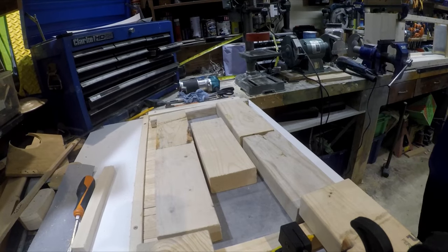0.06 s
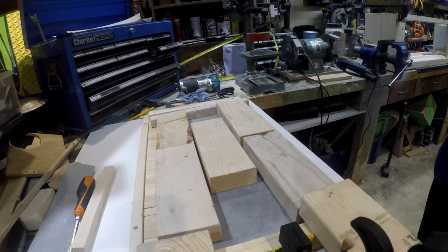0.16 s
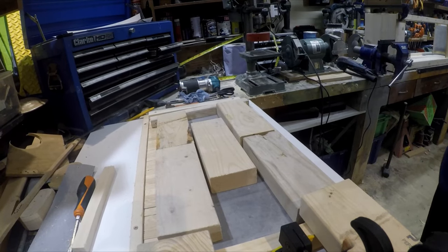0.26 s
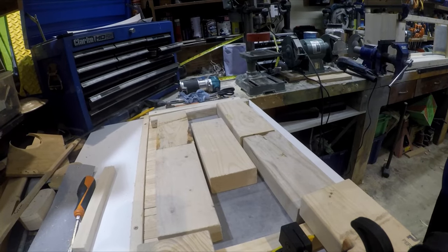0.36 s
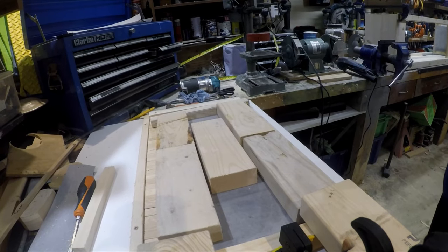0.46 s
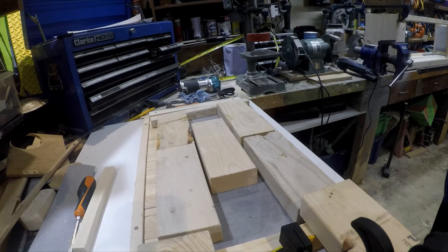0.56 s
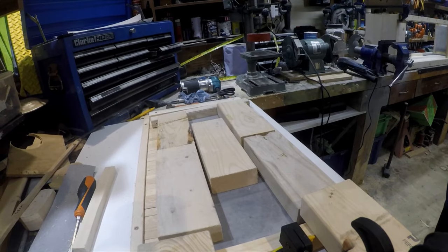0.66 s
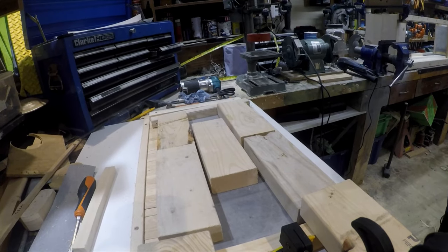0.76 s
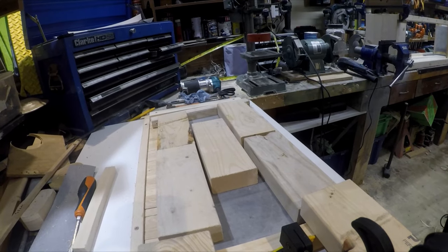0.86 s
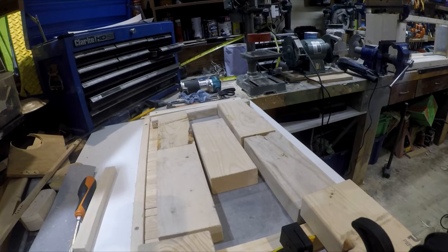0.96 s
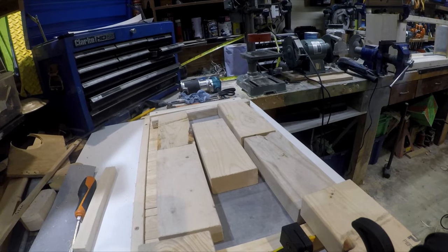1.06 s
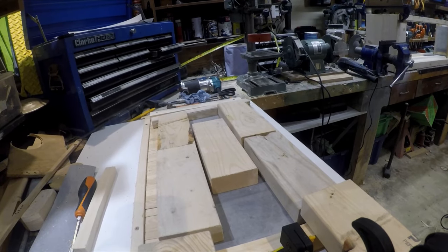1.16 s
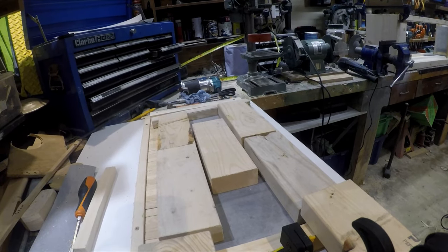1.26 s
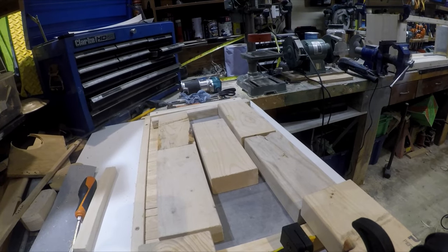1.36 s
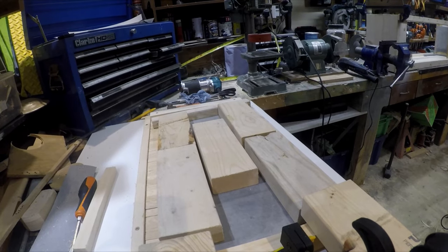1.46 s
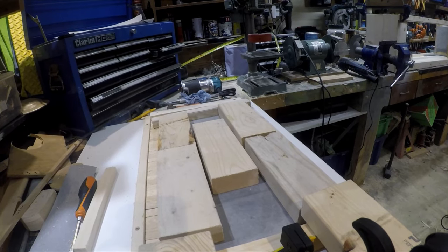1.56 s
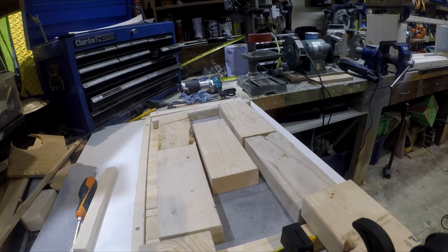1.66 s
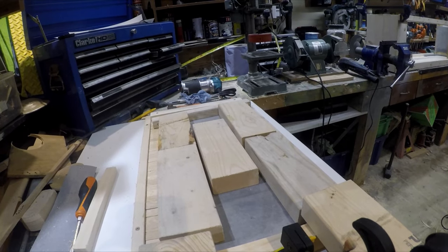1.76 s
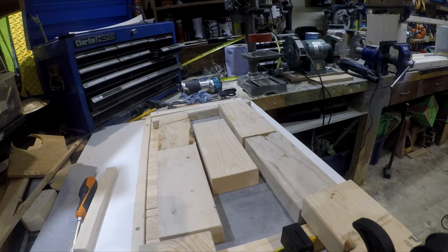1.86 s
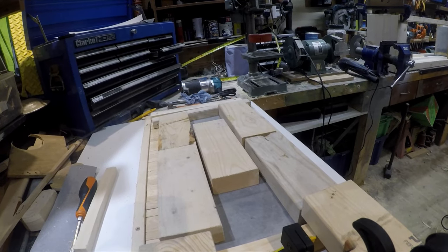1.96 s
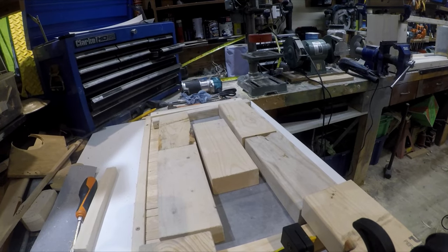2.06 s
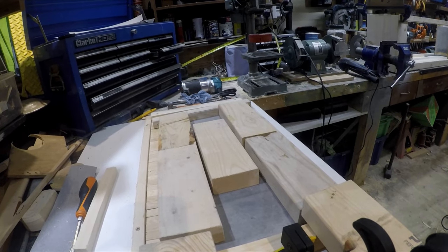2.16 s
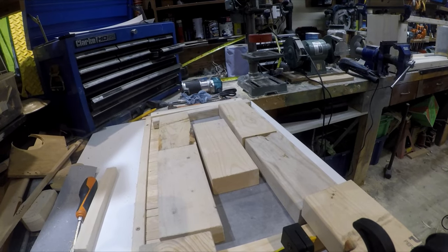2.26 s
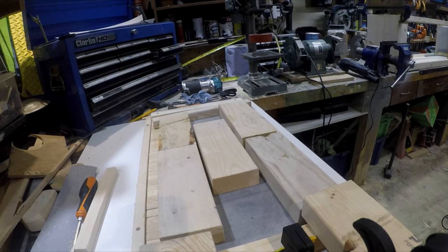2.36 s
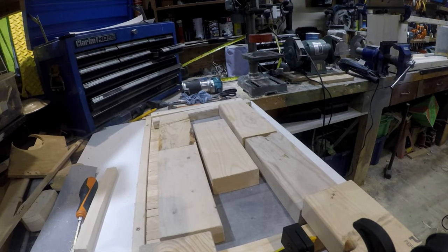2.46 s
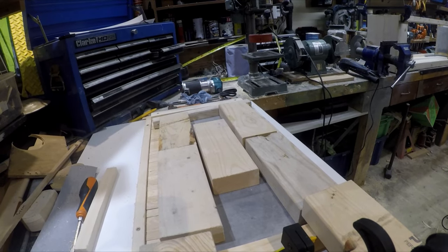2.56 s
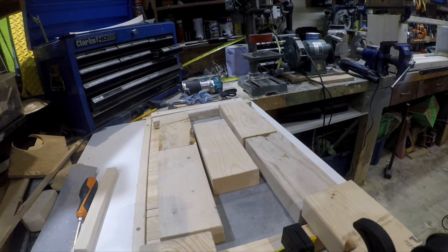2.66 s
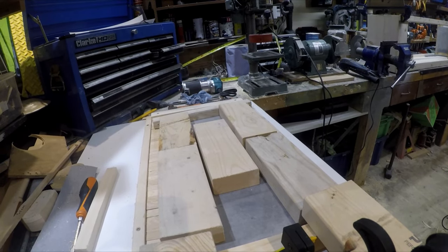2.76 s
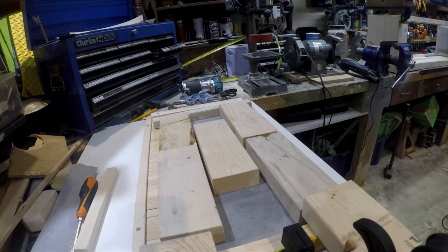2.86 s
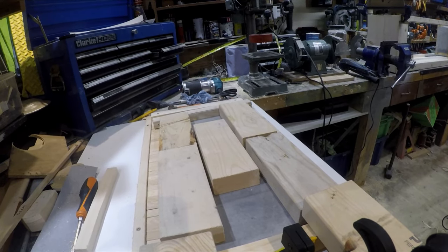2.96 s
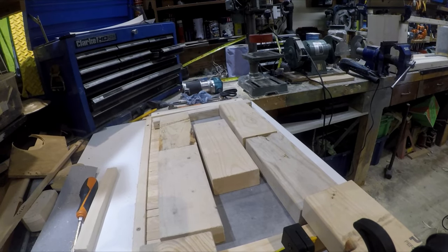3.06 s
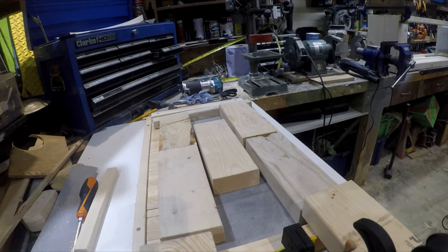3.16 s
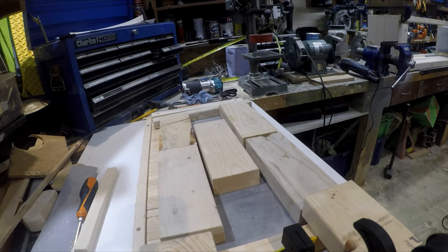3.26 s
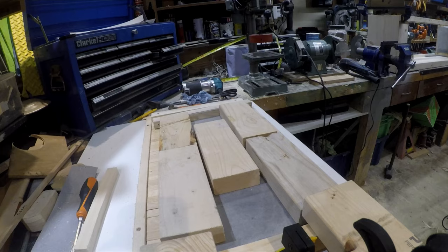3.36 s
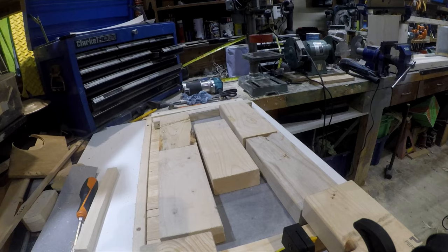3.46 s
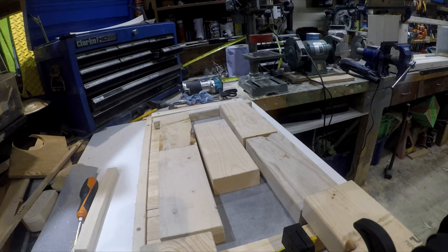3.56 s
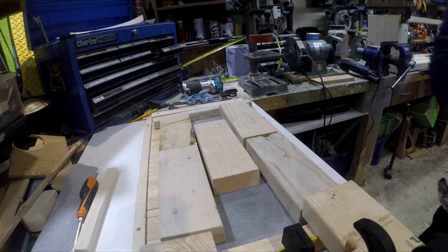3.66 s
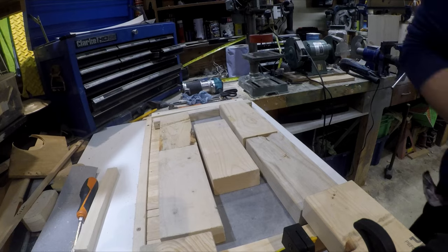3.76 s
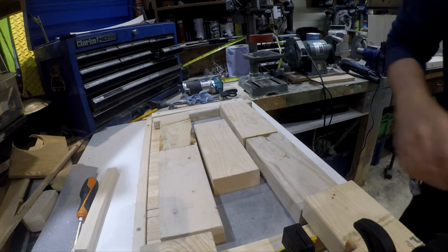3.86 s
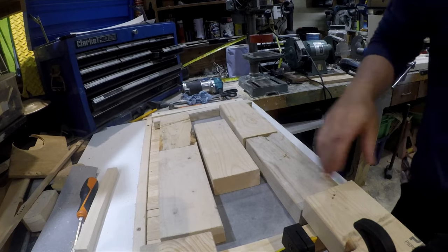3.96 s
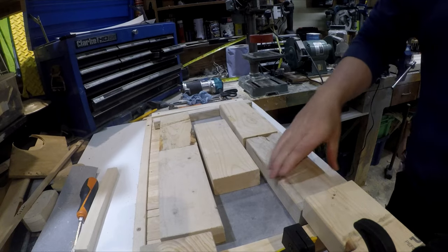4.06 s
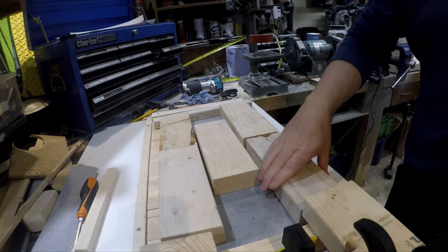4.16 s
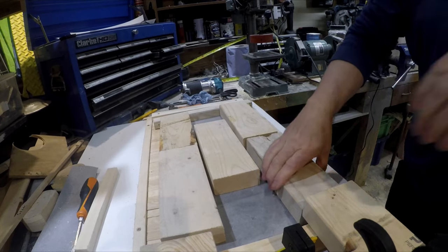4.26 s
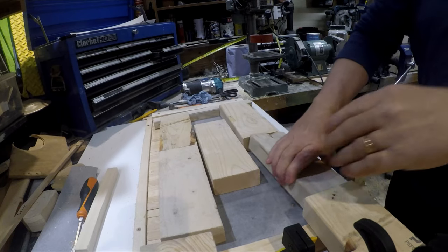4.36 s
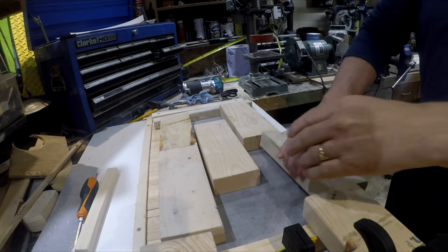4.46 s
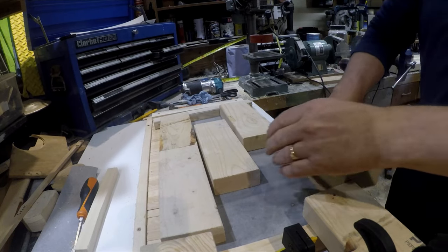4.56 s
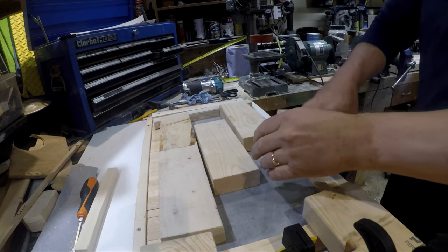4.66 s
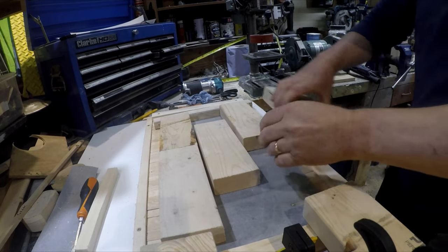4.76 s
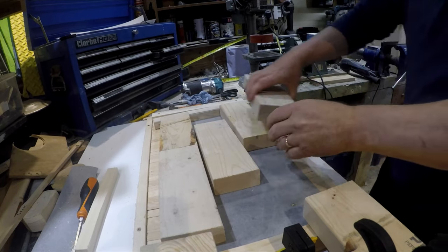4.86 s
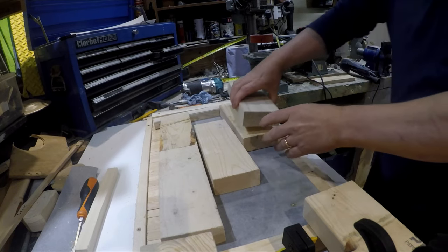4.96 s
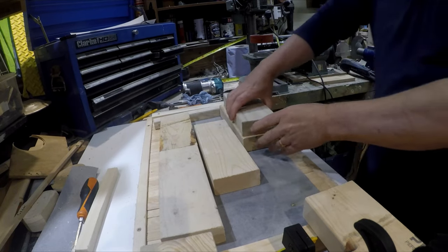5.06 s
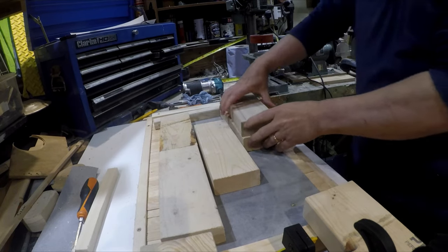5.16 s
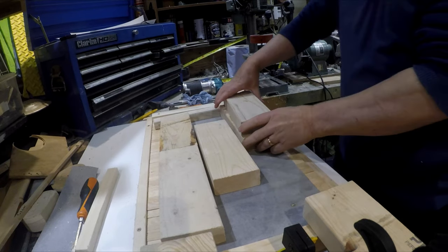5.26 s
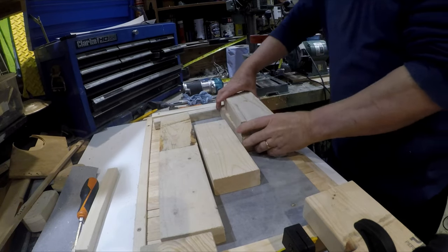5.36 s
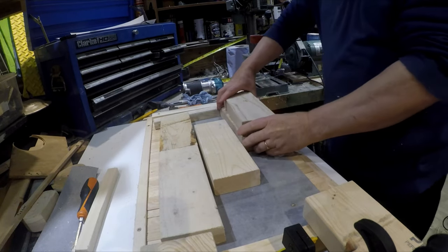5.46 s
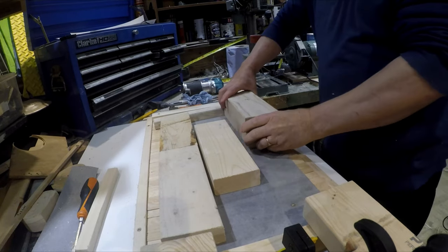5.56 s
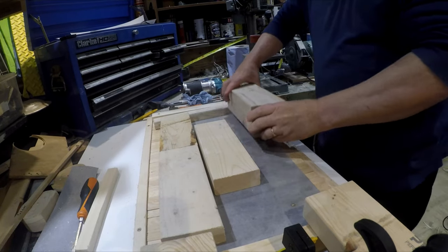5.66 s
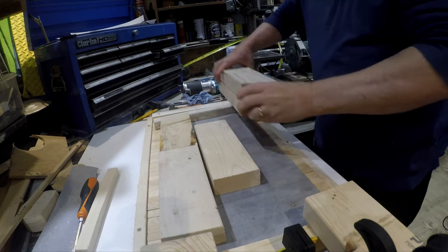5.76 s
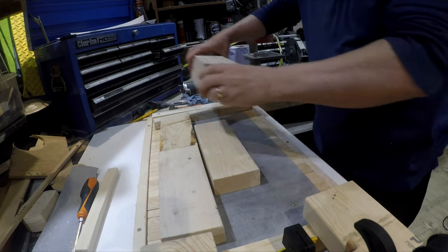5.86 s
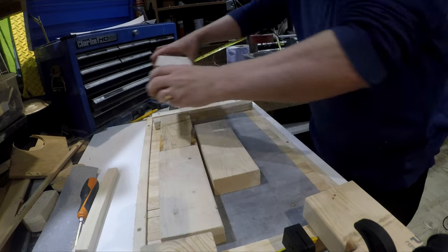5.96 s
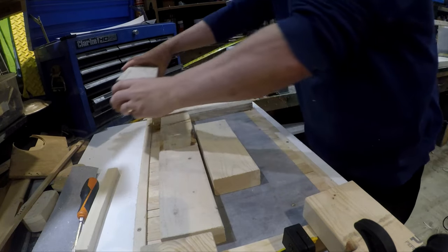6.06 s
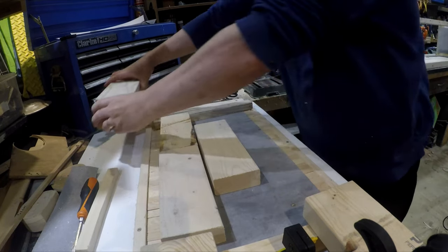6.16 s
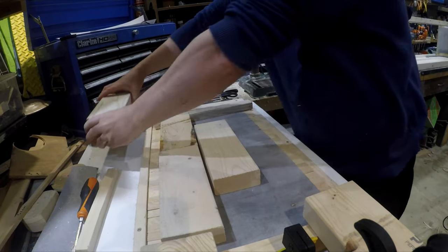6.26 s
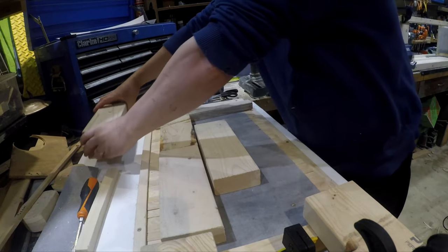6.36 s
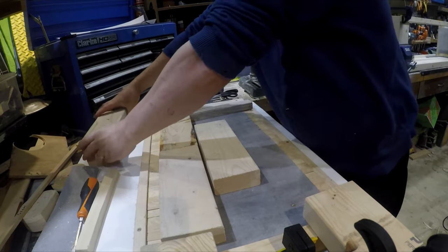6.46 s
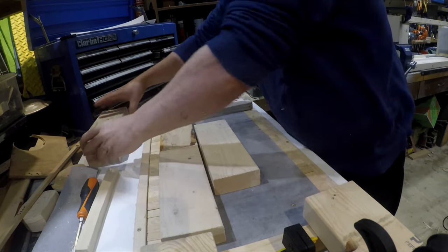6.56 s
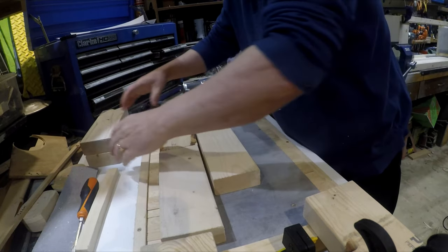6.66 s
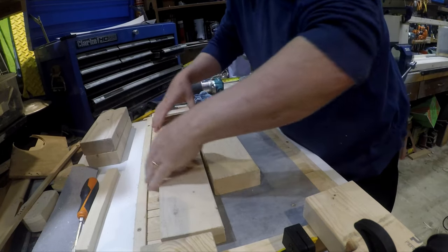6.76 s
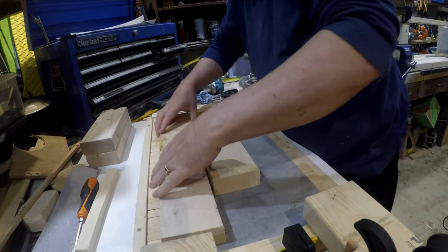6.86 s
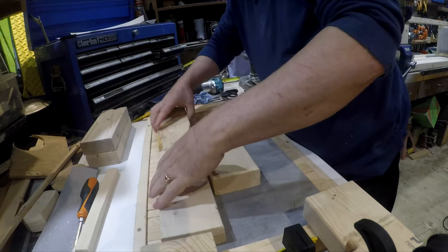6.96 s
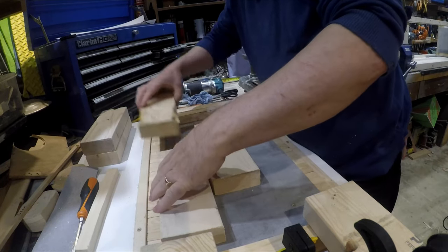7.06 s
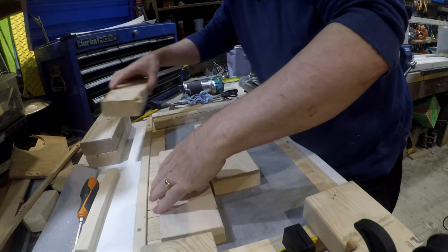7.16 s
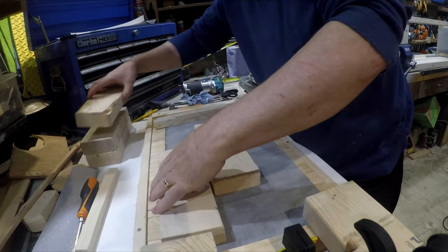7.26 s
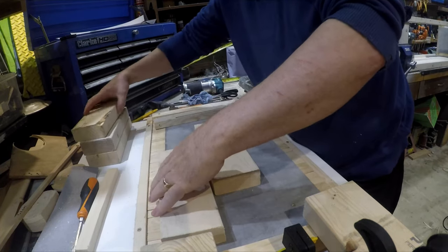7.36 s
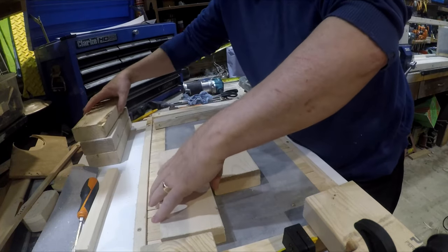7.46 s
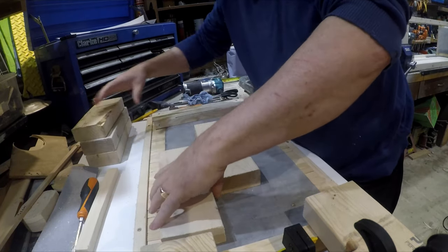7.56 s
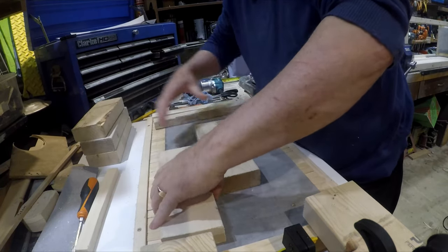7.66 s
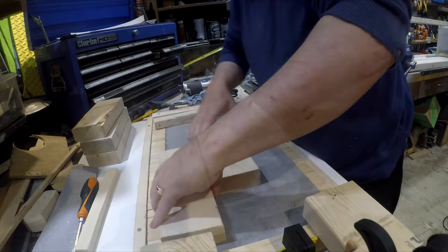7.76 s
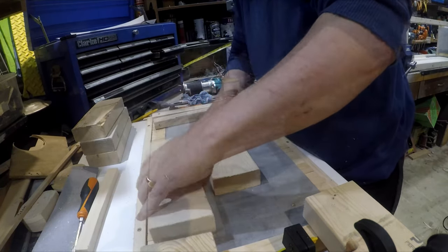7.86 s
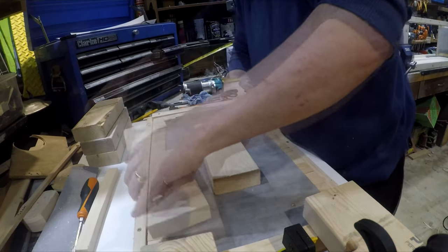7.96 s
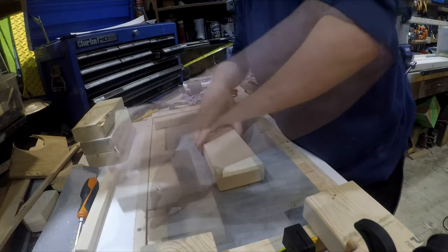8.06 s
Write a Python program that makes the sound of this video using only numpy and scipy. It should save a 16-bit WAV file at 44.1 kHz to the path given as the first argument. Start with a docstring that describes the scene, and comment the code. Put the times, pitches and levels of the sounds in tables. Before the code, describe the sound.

Wooden blocks bump, scrape and knock on a workshop bench over a low hum, with microphone rumble and buzz, before being stacked.

```python
"""Wooden blocks are knocked, slid and stacked on a workbench that also carries a camera.
From the start there is a low hum, and the camera trembles: a rumble, with a buzz from its right microphone.
For over three seconds things are shifted out of sight: bumps and scrapes, with rumble and buzz in step.
Then one block is pulled free and set down with hard knocks, and a second is put on top.
The last contacts set off a thin, very high fizz, and the sound falls away. All is shaped noise and fading tones."""
import sys
import numpy as np
from scipy import signal
from scipy.fft import rfft, irfft
from scipy.io import wavfile
from scipy.ndimage import uniform_filter1d

SR = 44100
rng = np.random.default_rng(int(sys.argv[2]) if len(sys.argv) > 2 else 0)


def waveform_to_disk(signal):
    """Save audio, clipped to [-1, 1], as 16-bit WAV at the path in sys.argv[1]."""
    frames = np.transpose(np.atleast_2d(signal))
    scaled = np.clip(frames, -1, 1) * 32767
    samples = np.round(scaled).astype(np.int16)
    wavfile.write(sys.argv[1], SR, samples)


N = 357210  # length in samples, 8.1 s

# Table levels are starting values: the functions below them may add trims in dB.


def amp(db):
    """Turns decibels into a plain multiplier."""
    return 10 ** (np.asarray(db) / 20)


def evened(x):
    """Scales x so that its average strength (RMS) is 1."""
    return x / np.sqrt(np.mean(x ** 2) + 1e-20)


def read(points, hz):
    """Reads a table of (f/Hz, value) between its points, on a log-frequency axis."""
    f, value = np.transpose(points)
    return np.interp(np.log(hz + 1), np.log(f), value)


def level(rows):
    """Multiplier over time from a table of (t/s, level/dB); the end values hold outside it."""
    return amp(np.interp(np.arange(N) / SR, *np.transpose(rows)))


def add(mix, s, sound):
    """Adds a sound into the mix from second s, cut off at the end of the mix."""
    part = mix[:, round(s * SR):][:, :sound.shape[1]]
    part += sound[:, :part.shape[1]]


def rfft_hz(length):
    """Frequencies of the spectrum of a sound this long."""
    return np.fft.rfftfreq(length, 1 / SR)


def shaped(x, colour):
    """Gives x a tone colour by weighting its spectrum, then brings it to unit strength."""
    length = x.shape[-1]
    spectrum = rfft(x) * amp(read(colour, rfft_hz(length)))
    return evened(irfft(spectrum, length))


def band(x, hz, kind, order=2):
    """Filters x to keep only the low, the high or a band of frequencies."""
    return signal.sosfilt(signal.butter(order, hz, kind, fs=SR, output="sos"), x)


def noise_pair(length, same):
    """Left and right white noise; same=1 makes them identical, 0 unrelated."""
    a, b = rng.standard_normal((2, length))
    same = np.clip(same, -1, 1)
    return np.array([a, same * a + np.sqrt(1 - same ** 2) * b])


def wander(hz):
    """Random drift of unit strength, changing at rates up to about hz."""
    return evened(band(rng.standard_normal(N), hz, "low"))


def dying(x, t60):
    """Lets each frequency of x fade at its own speed; t60 is the time to drop 60 dB."""
    hz, t, z = signal.stft(x, SR, nperseg=256)
    faded = z * amp(-60 * t / read(t60, hz)[:, None])
    return signal.istft(faded, SR, nperseg=256)[1][:, :x.shape[1]]


def ports(x, left_db, lag=0.00021):
    """The left side is heard lag seconds later than the right."""
    left = irfft(rfft(x[0]) * np.exp(-2j * np.pi * rfft_hz(N) * lag), N)
    return np.array([left, x[1]]) * amp([[left_db], [-left_db]])


# where the work is heard, and how wide the sound spreads; late on it narrows to one side # columns: t/s, left
# side's gain and right side's loss (level/dB), stereo width (0-1)
PLACE = [(0, 1, 0.92), (3.5, 0, 0.85), (4.3, -1, 1), (5.1, 0.4, 0.73), (6.6, 0.5, 0.9), (7.098, 3.5, 0.22),
         (8.1, 6, 0)]


def side_lean():
    """Left side's multiplier over time; the right side is divided by it."""
    return level([(s, db) for s, db, _ in PLACE])


def stereo_width():
    """How far apart the two sides sound, over time: 0 makes them the same."""
    s, _, width = np.transpose(PLACE)
    return np.clip(np.interp(np.arange(N) / SR, s, width), 0, 1)


# tone of the workshop hum; columns: f/Hz, level/dB (per Hz, relative)
HUM_COLOUR = [(60, -51), (110, -38), (140, -4.5), (168, 5), (200, -2.5), (245, -8.5), (340, -5.5),
              (500, -10.5), (700, -19.5), (1200, -31), (2500, -28), (5000, -38), (9000, -33), (15000, -57)]
# strength of the hum over time; columns: t/s, level/dB
HUM_LEVEL = [(0, -43), (3.8, -41.5), (5, -44.5), (6.45, -43.5), (6.8, -51.5), (8.1, -60.5)]


def hum(left_db=0.95, same=0.61, air_db=-70):
    """A low workshop drone made of shaped noise, over a faint even air noise."""
    drone = level(HUM_LEVEL) * ports(shaped(noise_pair(N, same), HUM_COLOUR), left_db)
    air_colour = [(100, -29.5), (950, 1.5), (1700, -7), (2800, -8.5), (5000, -14), (15000, -26)]
    air = amp(air_db) * shaped(noise_pair(N, 0.98), air_colour)
    return drone + air


# each push or pull on the wood drags it, brushes it and rocks the bench
# columns: t/s, length/s, drag level/dB, brush level/dB, rocking level/dB
MOVES = [(0.208, 0.07, -25.5, -52, -45), (0.433, 0.1, -35.5, -62, -45), (0.563, 0.078, -46, -55.5, -35),
         (1.225, 0.036, -29, -62, -58), (1.934, 0.076, -28.5, -60, -23), (2.055, 0.068, -31.5, -60, -22.5),
         (2.134, 0.074, -29.5, -63, -23.5), (2.239, 0.096, -38.5, -60, -28), (2.425, 0.093, -31, -49, -26),
         (2.556, 0.21, -30.5, -37.5, -20.5), (2.84, 0.19, -31.5, -39.5, -30.5),
         (3.137, 0.095, -43, -51, -31.5), (3.206, 0.068, -37.5, -77, -24.5), (3.556, 0.023, -40, -64, -41),
         (4.286, 0.039, -31.5, -39, -34.5), (4.353, 0.22, -30, -42, -38.5), (5.03, 0.074, -39, -75, -44),
         (5.523, 0.068, -41.5, -46, -32.5), (5.921, 0.1, -35.5, -50, -43), (5.98, 0.052, -26.5, -40.5, -44),
         (6.447, 0.13, -36, -69, -38), (7.368, 0.13, -40, -49, -32), (7.816, 0.03, -42, -43.5, -45.5)]


def effort(strengths_db, attack_s, release_s):
    """Every move builds up, lasts about its length, then dies away; overlapping moves add as power."""
    power, t = np.zeros((1, N)), np.arange(SR) / SR
    for (s, length, *_), db in zip(MOVES, strengths_db):
        rise = np.minimum(t / attack_s, 1)
        fall = np.exp(-np.maximum(t - length, 0) / release_s)
        add(power, s, (amp(db) * rise * fall)[None] ** 2)
    return np.sqrt(power[0])


# tone of the camera rocking on its mount; columns: f/Hz, level/dB (per Hz, relative)
SWAY_COLOUR = [(17, -40.5), (26, -15.5), (33, -6), (39, 4), (46, -16.5), (57, 1.5), (72, -8), (100, -15.5),
               (140, -23.5), (250, -82.5)]
# the bench never stands quite still; it trembles more while someone moves beside it
# columns: t/s, level/dB
TREMBLE = [(0, -52), (1.8, -64), (3.6, -42), (4.8, -56), (5.3, -42.5), (5.8, -57), (8.1, -50.5)]


def sway(sway_db=-1, left_db=1.8, steady_s=0.067):
    """The mount rocks at a few tens of Hz with each move, nearly alike in both microphones."""
    rock = shaped(noise_pair(N, 0.923), SWAY_COLOUR)
    # smooth out the noise's own ups and downs, so that the moves set the strength
    rock /= np.sqrt(uniform_filter1d(rock[0] ** 2, int(steady_s * SR)) + 1e-6)
    push = effort([db for *_, db in MOVES], attack_s=0.035, release_s=0.09)
    return amp(sway_db) * np.hypot(push, level(TREMBLE)) * ports(rock, left_db)


# how readily the microphone buzzes; columns: t/s, level/dB
LOOSENESS = [(0, -10), (2.7, -15), (6.3, -13.5), (6.55, -14.5), (7.25, -23.5), (8.1, -49)]
# tone of the buzz's hiss; columns: f/Hz, level/dB (per Hz, relative)
BUZZ_COLOUR = [(200, -14.5), (600, 11.5), (1000, 8), (2000, 0.5), (3300, -6.5), (4200, -7), (5100, -8.5),
               (5800, 1), (7000, -3), (7700, -1), (8700, -13), (9600, -8), (11000, -5), (15000, -18)]
# shrill modes of the microphone; columns: f/Hz, width (f/Hz), level/dB
BUZZ_MODES = [(6240, 230, -11), (7930, 220, -6), (9720, 250, -10)]


def buzz(sound, power=0.81, slack_db=-56, hiss_db=-2, ring_db=0, jolt_hiss=0.98,
         flutter_db=4, flutter_hz=50, leak_hz=4500):
    """Half swings of the low sound beyond a little slack shake hiss and ringing from the right microphone."""
    swing = abs(band(sound[1], 610, "low"))
    shake = np.maximum(swing - amp(slack_db), 0) ** power
    puffs, rattle = shake * level(LOOSENESS), jolts()
    hiss = shaped(rng.standard_normal(N), BUZZ_COLOUR)
    out = amp(hiss_db) * (puffs + jolt_hiss * rattle) * hiss
    for hz, width, db in BUZZ_MODES:
        flutter = evened(amp(flutter_db * wander(flutter_hz)))
        kicks = (rattle + puffs * flutter) * rng.standard_normal(N)
        ring = signal.lfilter(*signal.iirpeak(hz, hz / width, SR), kicks)
        out += amp(db + ring_db) * ring * np.sqrt(SR / np.pi / width)  # makes up for the narrow filter
    # stereo widening feeds the buzz below leak_hz to the left side, inverted and 0.09 ms late
    hz = rfft_hz(N)
    cross = -np.exp(-2j * np.pi * hz * 9e-5) / np.sqrt(1 + (hz / leak_hz) ** 30)
    left = stereo_width() * irfft(rfft(out) * cross, N)
    return np.array([left, out + fizz()])


# the bench top with the blocks on it
# columns: f/Hz, level/dB (relative), left side's lead (radians, at full width)
WOOD_MODES = [(150.2, -7, 0.96), (188, 1, 1.5), (233, -5, 1.7), (275.2, -5.5, 4.5), (367, -4, 1),
              (420, -4, 2.5), (495, -3.5, 1), (581, -2.5, -1.5), (835, -6.5, 7), (962, -18, 1),
              (1074, -15.5, 12), (1420, -22.5, -0.5), (1585, -17, 5)]
# dense short-lived ringing of a blow; columns: f/Hz, level/dB (per Hz, relative)
CLATTER = [(60, -71), (110, -26), (160, 13.5), (500, 8.5), (720, 7), (1000, -7.5), (2000, -17), (4000, -21),
           (9000, -27), (16000, -61)]
# how long that ringing lasts; columns: f/Hz, time to drop 60 dB (t/s)
CLATTER_T60 = [(150, 0.27), (500, 0.15), (1500, 0.16), (8000, 0.079)]


def ring_time(hz, at_200=0.14):
    """Wood damps its higher modes sooner: seconds to drop 60 dB."""
    return at_200 * (200 / hz) ** .75


def blows(rows, width, clatter_db, thump_db, body_db, clack_db, rise, detune, favour_db, early):
    """Each blow rings the wood's modes and a dense clatter; where it lands favours one low and one middle mode."""
    out, t = np.zeros((2, N)), np.arange(SR // 2) / SR
    leads = [(hz, lead) for hz, _, lead in WOOD_MODES]
    for s, db, body, clack, thump_hz, body_hz, clack_hz in rows:
        favoured = [(hz, favour_db, read(leads, hz)) for hz in (thump_hz, body_hz)]
        clatter = shaped(noise_pair(len(t), 1 - width), CLATTER)
        ring = amp(clatter_db) * dying(clatter, CLATTER_T60)
        for hz, mode_db, lead in favoured + list(WOOD_MODES):
            pitch = hz * (1 + detune * rng.standard_normal())
            turn = 2 * np.pi * (pitch * t + rng.random())
            fade = np.exp(-np.log(1000) * t / ring_time(hz))
            ring += amp(mode_db) * fade * np.sin([turn + width * lead, turn])
        ring *= 1 - np.exp(-t / rise)
        thump_part = band(ring, (120, 290), "band")
        body_part = band(ring, (280, 640), "band", order=4)
        clack_part = band(ring, clack_hz, "high", order=5)
        # the bench starts to give just before the faces clack together
        for part, part_db, start in ((thump_part, thump_db, s - early),
                                     (body_part, body + body_db, s),
                                     (clack_part, clack + clack_db, s)):
            attack = np.sqrt(np.mean(part[:, :SR // 40] ** 2))  # strength of the first 25 ms
            add(out, start, amp(db + part_db) * part / attack)
    return out


# blows on the bench from out of sight
# columns: t/s, thump level/dB, body level/dB re thump, clack level/dB re thump,
#          thump f/Hz, body f/Hz, lowest clack f/Hz
BUMPS = [(0.15, -15.5, -3.5, -30, 148, 482, 900), (0.169, -12, -11.5, -17, 174.6, 344, 900),
         (0.228, -17, -15, -28.5, 194, 440, 760), (0.26, -18, -5.5, -29, 197.3, 364, 760),
         (0.453, -36, 6, -6, 188, 507, 700), (1.244, -30.5, 2.5, -11, 156, 318, 800),
         (1.263, -27.5, 2, 2.5, 152.4, 340, 900), (1.279, -30, 3, 1, 163, 360, 850),
         (1.939, -13, -17.5, -13, 257, 283.6, 800), (1.989, -19.5, -22, -11, 287, 292, 900),
         (2.086, -20.5, -6, -20, 254, 304, 900), (2.158, -16.5, -18, -25, 196, 295, 900),
         (2.28, -25, -27, -32, 230, 360, 900), (2.651, -12.5, -23, -36, 198, 340, 900),
         (2.897, -31, 6.5, -6, 255, 334, 760), (2.978, -24.5, -8, -18, 206, 300, 760)]


def bumps():
    """Things shifted out of sight bump the bench, ringing its wood with a softer onset."""
    hits = blows(BUMPS, width=0.5, clatter_db=-1, thump_db=-6.0, body_db=-6.5, clack_db=-10.5,
                 rise=0.0013, detune=0.014, favour_db=5.5, early=0.0034)
    return ports(hits, left_db=0.5)


# how long the room rings; columns: f/Hz, time to drop 60 dB (t/s)
ROOM_T60 = [(100, 0.98), (250, 0.71), (600, 0.26), (2000, 0.23), (10000, 0.29)]


def room(x, wet_db=-15, delay=0.0027):
    """A cluttered workshop gives a short diffuse tail: x is smeared by fading noise."""
    build_up = 1 - np.exp(-(np.arange(SR) / SR / delay) ** 2)
    tail = dying(noise_pair(SR, 0.61), ROOM_T60) * build_up
    return amp(wet_db) * signal.fftconvolve(x, tail / np.linalg.norm(tail[0]), axes=1)[:, :N]


# sharp jolts that set the microphone rattling; columns: t/s (start), level/dB (peak)
JOLTS = [(0.16, -28), (0.193, -33), (0.2578, -41), (0.627, -32), (1.943, -20.5), (2.0223, -24.5),
         (2.0915, -20.5), (2.156, -21), (2.203, -25), (2.2434, -31.5), (2.2734, -29), (2.46, -32.5),
         (2.5016, -31.5), (2.547, -33.5), (2.6605, -26), (2.709, -25.5), (2.725, -27), (2.833, -33.5),
         (3.235, -35)]


def jolts(jolt_db=-1, swell=0.0041):
    """Strength of the rattle: each jolt peaks after swell seconds and quickly dies away."""
    out, u = np.zeros((1, N)), np.arange(SR // 20) / SR / swell
    for s, db in JOLTS:
        add(out, s, amp(db + jolt_db) * (u * np.exp(1 - u))[None] ** 2)
    return out[0]


# tone of wood dragged over the bench; columns: f/Hz, level/dB (per Hz, relative)
SLIDE_COLOUR = [(70, -34), (120, -7), (170, 1.5), (240, 1.5), (300, -2), (400, -6), (490, -2.5),
                (545, -13.5), (610, -4), (700, -14), (950, -23), (1500, -24.5), (4000, -44), (12000, -69)]


def slides(slide_db=-3, catch_db=2.0, catch_hz=110, same=0.75):
    """Dragged wood catches and slips, so the bench's resonances sound in uneven spurts."""
    drag = effort([db for _, _, db, _, _ in MOVES], attack_s=0.012, release_s=0.04)
    force = drag * evened(amp(catch_db * wander(catch_hz)))
    return amp(slide_db) * force * ports(shaped(noise_pair(N, same), SLIDE_COLOUR), 0)


# dry hiss of skin, sleeve and grain rubbing; columns: f/Hz, level/dB (per Hz, relative)
RUB_COLOUR = [(500, -21), (1200, 4.5), (2700, 10.5), (4500, 4), (7000, 7), (10000, -0.5), (15000, -44)]


def rubs(rub_db=-12, grain_db=3, grain_hz=90):
    """A light grainy hiss as hands and blocks brush past."""
    brush = effort([db for _, _, _, db, _ in MOVES], attack_s=0.016, release_s=0.03)
    touch = brush * evened(amp(grain_db * wander(grain_hz)))
    return amp(rub_db) * touch * shaped(noise_pair(N, .3), RUB_COLOUR)


# hard knocks of block on bench or on block
# columns: t/s, thump level/dB, body level/dB re thump, clack level/dB re thump,
#          thump f/Hz, body f/Hz, lowest clack f/Hz
KNOCKS = [(4.364, -26.5, 0, -10, 218, 410, 1020), (4.414, -18.5, -7, -27, 191, 290, 900),
          (4.478, -34, 5.5, -20, 188, 460, 900), (4.508, -28, -1.5, -26, 220, 580, 760),
          (4.532, -18.5, -9.5, -23, 191, 616, 776), (4.576, -35, 5.5, -6, 209.4, 470, 895),
          (5.077, -15.5, -7, -16, 169.2, 498, 1130), (5.1, -24.5, -4.5, -31, 177, 493, 1150),
          (5.338, -35.5, -20, -36, 190, 314, 900), (5.549, -29.5, -24, -40, 193, 383, 900),
          (6.469, -21.5, -17, -21, 136.3, 500, 650), (6.479, -16.5, -7, -5.5, 174.5, 482, 654),
          (6.493, -31.5, 2, -10.5, 177, 502, 664), (6.579, -26.5, -27, -37, 152.6, 317, 760),
          (6.627, -28.5, -32, -36, 160, 327, 760), (6.678, -45, -16, -37, 164, 345, 760),
          (6.912, -45.5, -21, -31, 170, 460, 760), (7.384, -17, -11.5, -17.5, 253, 350, 880),
          (7.409, -24.5, 3, -8, 214, 467, 885), (7.421, -28, -4, -11, 288, 360, 890),
          (7.79, -61, -20, 2, 169, 310, 1500)]


def knocks():
    """Blocks knock on the bench or on each other, ringing the wood with a sharp onset and full width."""
    return blows(KNOCKS, width=1.0, clatter_db=-3.5, thump_db=-1.5, body_db=0, clack_db=0.0,
                 rise=0.00041, detune=0.0094, favour_db=6, early=0.00313)


# thin high fizz set off by the last contacts; columns: t/s, level/dB
FIZZES = [(7.382, -36), (7.41, -33.5), (7.83, -57)]


def fizz(t60=0.099, tail_db=-14, tail_t60=0.63, steady_db=-78):
    """A band of very high hiss, faint throughout, flares at each contact and trails off (t60s in s)."""
    power, t = np.zeros((1, N)), np.arange(SR // 2) / SR
    for s, db in FIZZES:
        flare = amp(-60 * t / t60) + amp(tail_db - 60 * t / tail_t60)
        add(power, s, (amp(db) * flare)[None] ** 2)
    hiss = band(rng.standard_normal(N), (11800, 14900), "band", order=4)
    return np.sqrt(power[0] + amp(steady_db) ** 2) * evened(hiss)


def scene():
    """Places the wood sounds in the room, adds rocking and hum, and sets the stereo width."""
    wood = bumps() + knocks() + slides() + rubs()
    lean, width = side_lean(), stereo_width()
    placed = (wood + width * room(wood)) * np.array([lean, 1 / lean])
    left, right = placed + sway() + hum()
    return np.array([width * left + (1 - width) * right, right])


# the sound falls away at the end; the first level also holds for all the time before
# columns: t/s, level/dB
FADE = [(7.8, -1.5), (7.95, -4), (8.1, -12)]


def record(dry):
    """The shaken microphone adds its buzz; then come the closing fade and an upper frequency limit."""
    edge = signal.firwin(255, 15500, window=("kaiser", 9), fs=SR)  # cuts above 15500 Hz
    faded = (dry + buzz(dry)) * level(FADE)
    return signal.oaconvolve(faded, edge[None], "same", axes=1)


dry = scene()
out = record(dry)
waveform_to_disk(out)
```